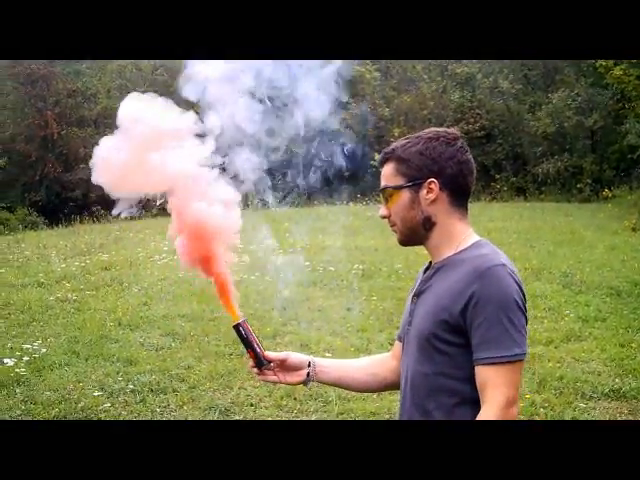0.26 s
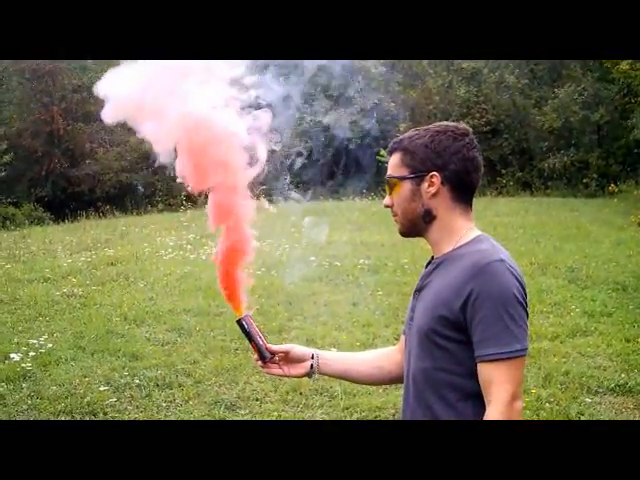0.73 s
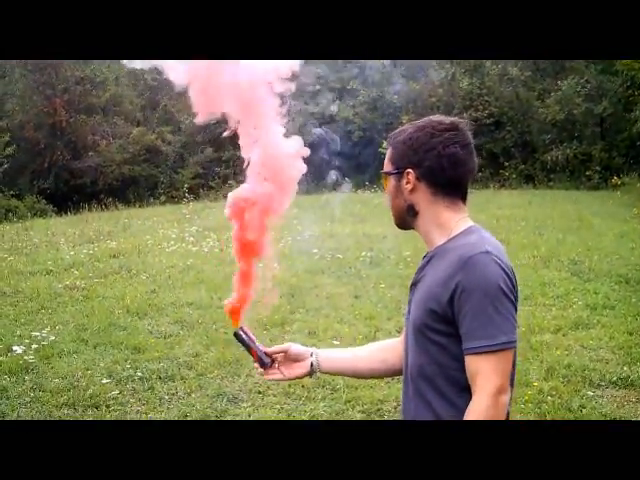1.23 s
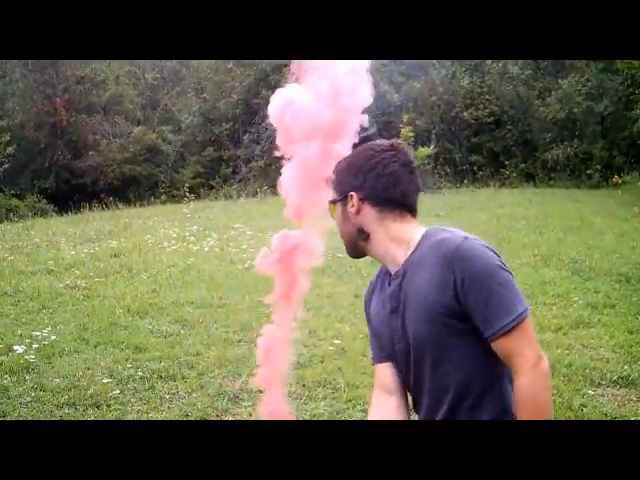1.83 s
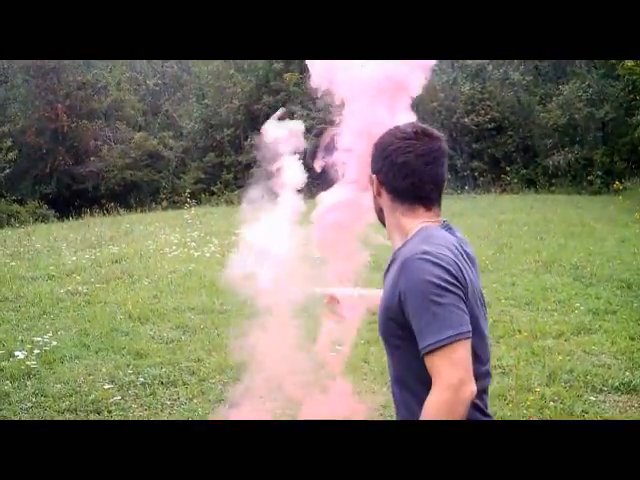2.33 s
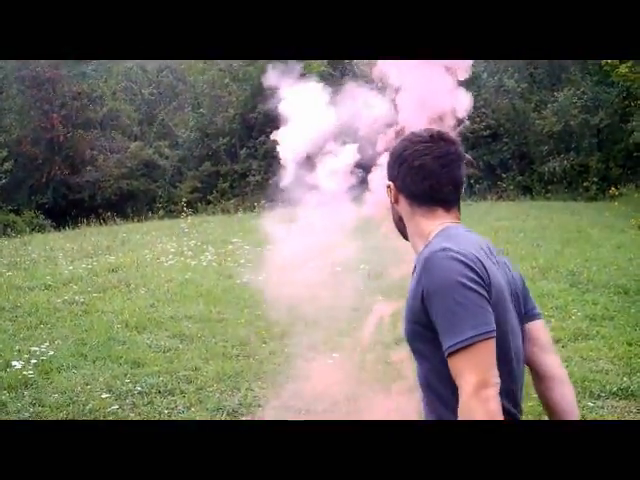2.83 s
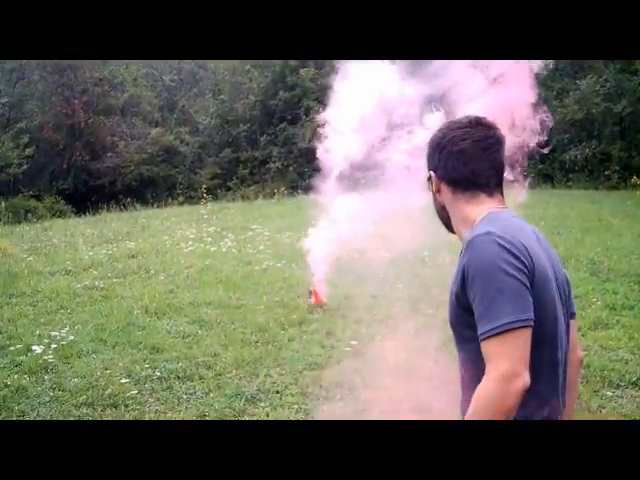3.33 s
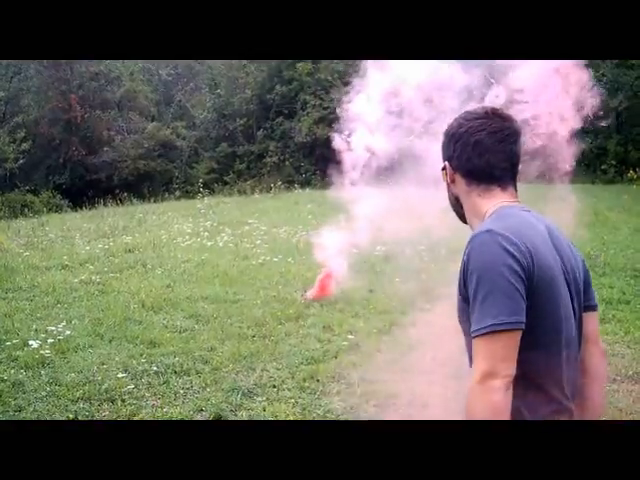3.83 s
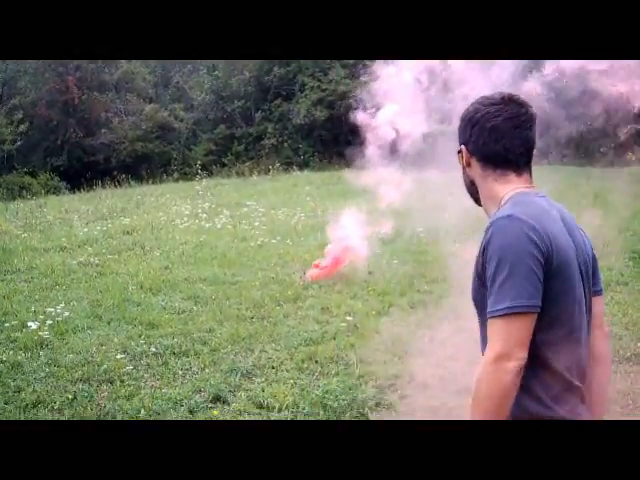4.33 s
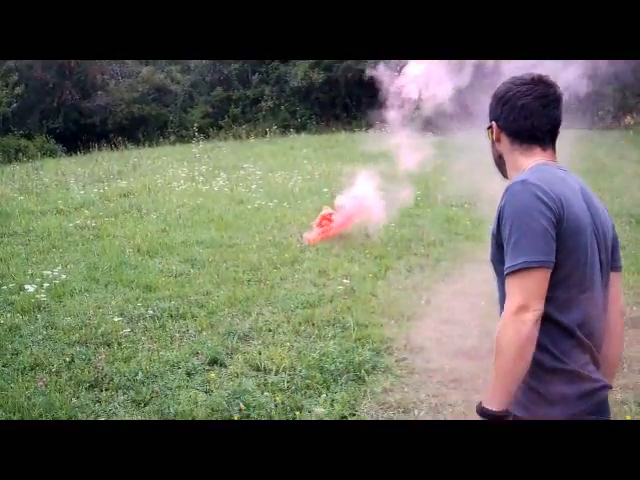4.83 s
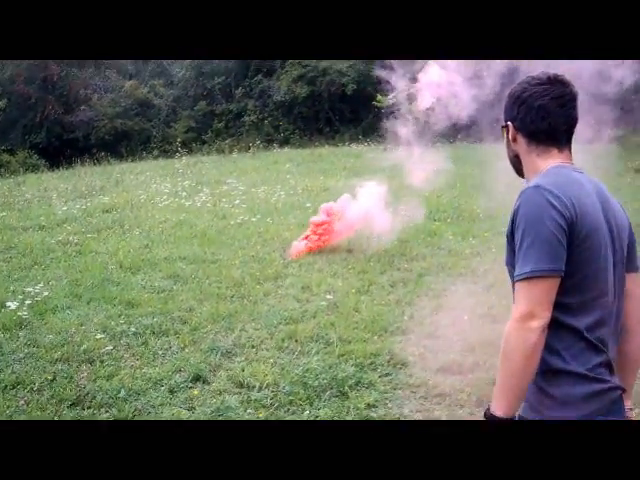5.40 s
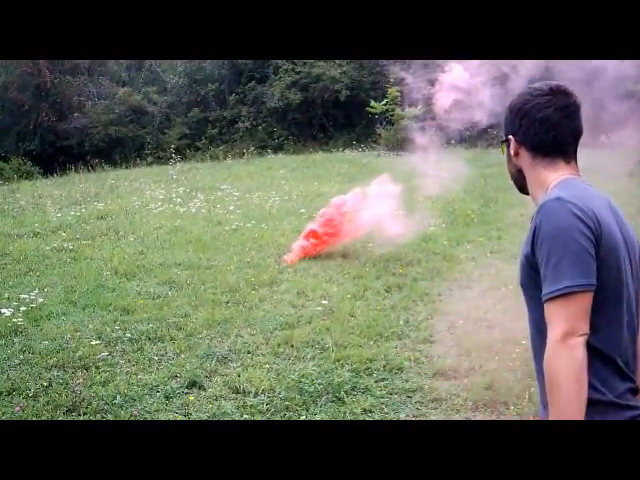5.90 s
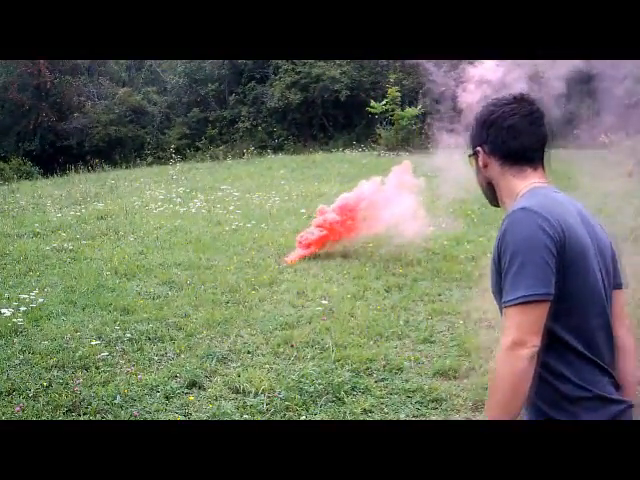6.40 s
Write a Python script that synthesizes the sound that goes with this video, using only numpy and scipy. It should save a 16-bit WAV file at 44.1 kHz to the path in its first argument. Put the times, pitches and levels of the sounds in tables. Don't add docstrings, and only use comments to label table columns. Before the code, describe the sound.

On an open meadow, a smoke canister gives a faint steady hiss under low wind rumble. Near one second a very loud, distorted bang bursts out, followed by smaller hollow pops and dry cracks at irregular gaps. The hiss swells briefly around two seconds, then recedes as the canister is thrown. Grass rustles and stalks snap later. Close, dry microphone with wind buffeting and dulled top treble.

```python
import sys
import numpy as np
from scipy import signal
from scipy.fft import rfft, irfft
from scipy.io import wavfile
from scipy.ndimage import uniform_filter1d, minimum_filter1d

SR = 44100
rng = np.random.default_rng(int(sys.argv[2]) if len(sys.argv) > 2 else 0)


def to_wav(sig):
    pcm = np.clip(np.atleast_2d(sig), -1, 1) * 32767
    pcm = np.round(pcm).astype(np.int16)
    wavfile.write(sys.argv[1], SR, pcm.T)


def how_loud(loudness_db):
    steps = np.asarray(loudness_db, float) / 20
    return 10 ** steps


N = 293392

# f/Hz, level/dB, t60/s
THUMP_MODES = [(166.2, -6, 0.17), (181.7, -11, 0.14)]


def evened(x):
    return x / np.sqrt(np.mean(x ** 2) + 1e-20)


def along(rows, silent_db=-120):
    s, db = np.transpose(rows)
    return how_loud(np.interp(np.arange(N) / SR, s, db, left=silent_db))


def swells(rows, calm_db=-120):
    t = np.arange(0, N + 64, 64) / SR
    power = how_loud(calm_db) ** 2
    for peak_s, db, rise, fall in rows:
        drop = np.maximum((peak_s - t) / rise, (t - peak_s) / fall)
        power = power + how_loud(db - 20 * drop) ** 2
    return np.interp(np.arange(N) / SR, t, np.sqrt(power))


def add(mix, s, sound):
    part = mix[round(s * SR):][:len(sound)]
    part += sound[:len(part)]


def noise(shape, patchy_db, flicker_db, size):
    frames, hz = 4 * N // size + 8, np.fft.rfftfreq(size, 1 / SR)
    a, b, patches = rng.standard_normal((frames, len(hz), 3)).T
    patches = uniform_filter1d(patches, size=8, axis=0)
    patches = evened(uniform_filter1d(patches, size=10, axis=1))
    flicker = evened(uniform_filter1d(rng.standard_normal(frames), size=3))
    f, db = np.transpose(shape)
    level_db = np.interp(np.log(hz + 1), np.log(f + 1), db, left=-60, right=-60)
    z = (a + 1j * b) * how_loud(level_db[:, None] + patchy_db * patches + flicker_db * flicker)
    return evened(signal.istft(z, nperseg=size, noverlap=size * 3 // 4)[1][:N])


def ring(modes, stretch=1):
    t = np.arange(SR // 4) / SR
    return sum(how_loud(db - 60 * t / t60) * np.sin(2 * np.pi * hz * stretch * t) for hz, db, t60 in modes)


def meadow_air():
    # f/Hz, level/dB per Hz
    air_spectrum = [(60, 7.5), (120, 2.5), (300, -4), (700, -7.5), (1200, -8), (1600, -13.5), (3000, -17),
                    (6000, -18.5), (8200, -19), (8700, -13.5), (9100, -23.5), (9700, -19.5)]
    return how_loud(-48.5) * noise(air_spectrum, patchy_db=1.25, flicker_db=0.3, size=1024)


def wind():
    # peak t/s, level/dB, rise/s, fall/s (both over 20 dB)
    gusts = [(.1, -43, .5, 0.43), (.52, -46.5, .1, 0.43), (.93, -25, 0.06, 0.15),
             (1.33, -34.5, 0.13, 0.094), (1.83, -42, .1, 0.11), (2.3, -52, 0.22, 0.17),
             (3.05, -43, 0.16, 0.26), (3.26, -40, .2, 0.26), (3.67, -33.5, 0.32, 0.22),
             (3.9, -30, 0.19, 0.14), (4.04, -36.5, .06, 0.26), (4.5, -32, 0.19, 0.36),
             (4.68, -37, 0.15, 0.086), (4.87, -35.5, .15, 0.22), (5.57, -37, 0.14, 0.12),
             (5.75, -39, .08, .08), (5.9, -26.5, 0.053, 0.13)]
    # f/Hz, level/dB per Hz
    wind_spectrum = [(8, 3), (22, -2.5), (40, -2), (70, -13.5), (120, -43.5), (250, -40)]
    lumps = noise(wind_spectrum, patchy_db=4.0, flicker_db=-2.5, size=4096)
    power = uniform_filter1d(uniform_filter1d(lumps ** 2, size=3000), size=3000)
    strength = np.sqrt(abs(power) + 0.052)
    return swells(gusts, calm_db=-45.5) * lumps / strength


def footfalls():
    # t/s, level/dB, f/Hz
    steps = [
        (4.47, -30.5, 78),
        (3.7, -41, 131),
    ]
    footfall_s = 0.06
    out, t = np.zeros(N), np.arange(0, footfall_s, 1 / SR)
    for s, db, hz in steps:
        add(out, s, how_loud(db) * np.hanning(len(t)) * np.sin(2 * np.pi * hz * t))
    return out


def grass():
    # peak t/s, level/dB, rise/s, fall/s (both over 20 dB)
    brushes = [
        (3.24, -50, 0.4, 0.37),
        (3.32, -44, 0.077, 0.09),
        (4.14, -51.5, 0.11, .7),
        (5.31, -44.5, 0.18, 0.2),
        (5.43, -46, .3, 0.27),
        (5.63, -44.5, 0.22, 0.22),
        (5.71, -46, 0.3, 0.036),
        (6.65, -52, 0.12, .1),
    ]
    # t/s, level/dB, centre f/Hz
    snaps = [
        (2.6194, -42, 2810),
        (3.305, -23, 8200),
        (3.3824, -40, 2960),
        (3.405, -59, 2860),
        (4.5665, -40, 3050),
        (5.68, -21.5, 6800),
        (5.697, -24, 3140),
        (5.7523, -38, 2860),
        (5.938, -35, 8650),
    ]
    # f/Hz, level/dB per Hz
    grass_spectrum = [(1500, -22), (2700, 3.5), (4200, 2.5), (5500, 4.5), (7500, 5.5), (9600, 5)]
    out = swells(brushes) * noise(grass_spectrum, patchy_db=1.5, flicker_db=1.2, size=256)
    t, decay_s = np.arange(200) / SR, .0006
    for (s, db, hz), chips in zip(snaps, rng.standard_normal((len(snaps), len(t)))):
        envelope = np.sqrt(t / decay_s) * np.exp(-t / decay_s)
        snap = (np.sin(2 * np.pi * hz * t) + .8 * chips) * envelope
        add(out, s, how_loud(db) * snap)
    return out


def smoke_jet():
    # t/s, level/dB
    jet_level = [(0, -55), (.6, -55), (1.2, -55), (1.55, -56), (1.9, -51.5), (2.1, -51.5), (2.35, -56.5),
                 (2.8, -59), (3.6, -60.5), (4.5, -63), (6.65, -69)]
    # f/Hz, level/dB per Hz
    nozzle_spectrum = [(600, -10.5), (1050, 1.5), (1500, -10.5), (2150, -6.5), (3200, -7.5), (4500, -15.5),
                       (7000, -29)]
    return along(jet_level) * noise(nozzle_spectrum, patchy_db=1.5, flicker_db=0.3, size=512)


def nudges():
    # t/s, level/dB, length/s
    squeezes = [
        (1.30, -26, 0.03),
        (5.704, -31, 0.05),
    ]
    out = np.zeros(N)
    for s, db, length in squeezes:
        t = np.arange(round(length * SR)) / SR
        squeeze = np.hanning(len(t)) * np.cos(2 * np.pi * THUMP_MODES[0][0] * t)
        swell = signal.fftconvolve(ring(THUMP_MODES), squeeze)
        add(out, s, how_loud(db) * swell / abs(swell).max())
    return out


def cracks():
    # t/s, level/dB, dull level/dB, bright level/dB, stretch of the mode frequencies
    bursts = [(.9122, -13, -5, 8, 0.5), (0.9173, 8.5, -3, 3, 1.0), (0.9217, 1, -5, 4, .9),
              (0.927, -14, 4, 2, 0.98), (1.284, -32, 5, -6, 1.3), (1.3268, -20.5, 4, 0.5, 1.03),
              (1.7922, -13.5, -5, 8, 0.96), (2.102, -33, 0, -16, 0.86), (2.5913, -15, -2, -1, 0.92),
              (3.4638, -31, -18, -34, 0.89), (3.585, -32.5, -17, -28, 1.0), (3.8901, -17.5, 3, -1, .94),
              (4.023, -28.5, 17, -29, 0.79), (4.7649, -13.5, 4.5, 14, .93),
              (5.8793, -19.5, -0.5, -15, 0.96), (5.892, -32, -3, -14, 1.0)]
    # f/Hz, level/dB, t60/s
    shell_modes = [(2930, 4.5, 0.02), (3434, 3, 0.026), (4096, 13.5, 0.012), (4320, -3, 0.036)]
    dull_modes = [(1435, 3.5, 0.018), (1782, 7.5, 0.024), (1990, -0.5, 0.015), (2120, 7, 0.0045)]
    bright_modes = [(4880, 0.5, 0.0083), (5580, 3, 0.0082), (6800, 0.5, 0.013), (8200, -7.5, 0.0084),
                    (9320, -6.5, 0.014)]
    out, t, length = np.zeros(N), np.arange(1024) / SR, 0.001
    grit = rng.standard_normal((len(bursts), len(t))) ** 3
    for (s, db, dull_db, bright_db, stretch), chips in zip(bursts, grit):
        shell = ring(shell_modes, stretch)
        shell += how_loud(dull_db) * ring(dull_modes, stretch)
        shell += how_loud(bright_db) * ring(bright_modes, stretch)
        burst = rfft(chips * t / length * np.exp(-t / length))
        even = irfft(burst / uniform_filter1d(abs(burst), size=9) ** .8)
        crack = signal.fftconvolve(shell, even * np.exp(-(t / (5 * length)) ** 4))
        add(out, s, how_loud(db) * crack / abs(crack).max())
    return out


def pops(rows, sign, lid_db):
    # f/Hz, level/dB, t60/s
    low_wall = [(359.6, -3.5, 0.063), (323, -12.5, 0.083), (435, -10.5, 0.045)]
    knock_modes = [(567.6, -2.5, 0.034), (534.5, -18, 0.13), (616, -24.5, 0.14)]
    lid = [(709.8, -2, 0.063)]
    # f/Hz, level/dB, t60/s
    rim = [(763, 0.27, 0.029)]
    upper_wall = [(969, -0.5, 0.029), (1112, -9.5, 0.043)]
    out, t = np.zeros(N), np.arange(SR // 4) / SR
    build = 1 - np.exp(-(t / .00045) ** 2)
    for s, db, thump_db, low_db, upper_db in rows:
        walls = ring(knock_modes)
        walls += how_loud(lid_db + 4.5) * (ring(lid) - ring(rim))
        walls += how_loud(upper_db + 5.0) * ring(upper_wall)
        walls -= how_loud(low_db) * ring(low_wall) + how_loud(thump_db) * ring(THUMP_MODES)
        add(out, s - .0001, -sign * how_loud(db) * build * walls)
    return out


def casing_blows():
    # t/s, knock level/dB, then thump, low wall and upper wall level/dB against the knock
    pushes = [(.9176, -3.5, -21, -0.5, -16), (1.289, -31, 0, -8, -5.5), (1.297, -34.5, 1, -1.5, -20),
              (1.793, -19.5, -8, -11, -14), (1.898, -39.5, 4, -6, -14), (2.101, -22, -8.5, -22, -13.5),
              (2.298, -28.5, -5, -18, -10.5), (2.592, -16.5, -10.5, -44, -13.5),
              (4.765, -32, -25, -19, -17), (5.135, -31, 1, -10, -16), (5.229, -25, -5.5, -18, -11.5),
              (5.317, -24.5, -5.5, -13, -9), (5.881, -18.5, -5, 0.5, -9)]
    pulls = [(0.517, -44, -6, -19, -7), (0.671, -33, -3, -13, -14), (1.243, -30.5, -3, -16, -12),
             (1.322, -30, -19, -16, -24), (3.152, -44, 3, -13, -16), (3.21, -29.5, -3.5, -15, -15),
             (3.466, -20.5, -8, -39, -11), (3.586, -21, -6.5, -17, -12), (3.754, -29, -16, -14, -9),
             (3.89, -19.5, -31, -9.5, -8), (4.024, -24.5, -14.5, -7.5, -11.5), (5.571, -41, 2, 0, -0.5),
             (5.951, -39, -5, 3, -9)]
    rebounds = [
        (.9218, -6.5, -7, -15, -1),
        (.9268, -39, -10, -19, -42),
        (1.3266, -15.5, -15, -19, -10.5),
        (5.8925, -27.5, 6, -9, -13),
    ]
    first_lid_db, rebound_lid_db = -7.5, -18
    first = pops(pushes, 1, first_lid_db) + pops(pulls, -1, first_lid_db)
    return first + pops(rebounds, 1, rebound_lid_db)


def scene():
    background = meadow_air() + wind() + footfalls() + grass()
    casing = nudges() + cracks() + casing_blows()
    return (background + smoke_jet() + casing)[None]


def starve(x, size, usual_db, near_pop_db, masked=.8):
    hz, _, z = signal.stft(x, SR, window="cosine", nperseg=size, noverlap=size // 2)
    knock = abs(z[(hz > 400) & (hz < 1200)]).mean(0)
    knock = -minimum_filter1d(-knock, size=1 + 2048 // size)
    busy = np.clip(np.log10(knock / np.median(knock)), 0, 1)
    treble = signal.medfilt(abs(z[hz > 2300]).mean(0), 15)
    usual = uniform_filter1d(np.median(abs(z), axis=1), size=15)
    floor = usual[:, None] * (treble / np.median(treble)) ** masked
    lasting = uniform_filter1d(uniform_filter1d(abs(z), size=3, axis=1), size=2, axis=0)
    faint = lasting < floor * how_loud(usual_db + near_pop_db * busy)
    faint &= hz[:, None] > 2000 + 4e5 / size
    return signal.istft(z * ~faint, SR, window="cosine", nperseg=size, noverlap=size // 2)[1][:N]


def roll_off(x):
    return signal.sosfilt(signal.butter(12, 9640, fs=SR, output="sos"), x)


def record(dry):
    power = abs(signal.lfilter([.01], [1, -.99], dry[0] ** 2))
    power_db = 10 * np.log10(power + 1e-12)
    fall = np.arange(N) * 180.0 / SR
    held_db = np.maximum.accumulate(power_db + fall) - fall
    over_db = np.maximum(held_db + 7.5, 0)
    duck_db = .4 * signal.lfilter([.004], [1, -.996], over_db)
    ducked = np.clip(dry / how_loud(duck_db), -1.08, 1.08)
    starved = starve(ducked[0], 1024, -5, 1.5)
    starved = starve(starved, 256, -16, 13.5)
    band = signal.firwin(801, 9620, window=("kaiser", 9), fs=SR)
    limited = signal.oaconvolve(starved[None], band[None], "same")
    return roll_off(np.clip(limited, -1, 1))


dry = scene()
out = record(dry)
to_wav(out)
```